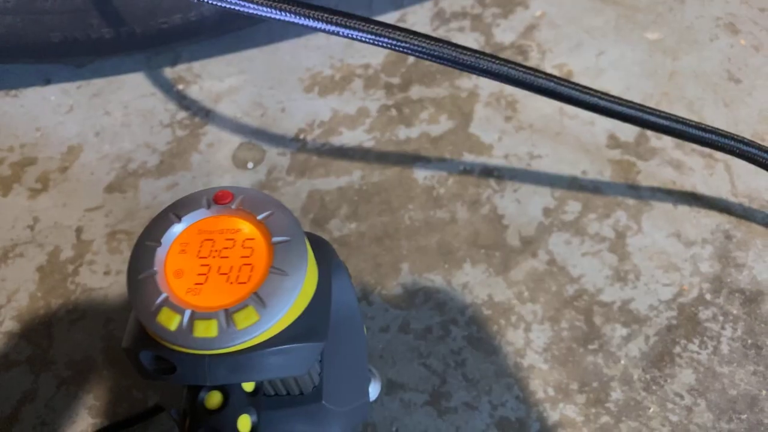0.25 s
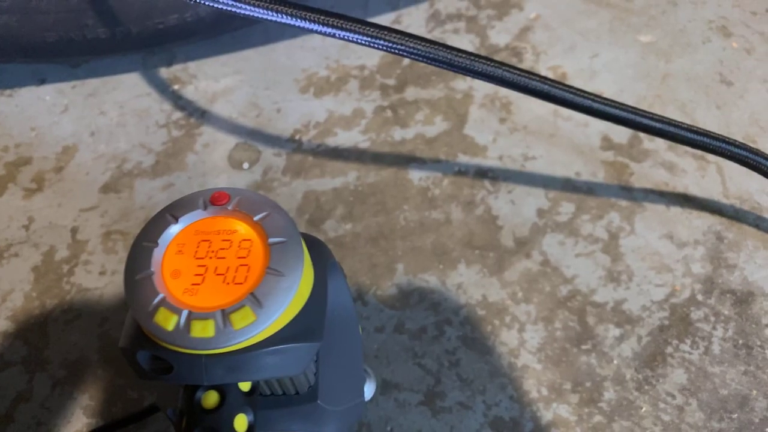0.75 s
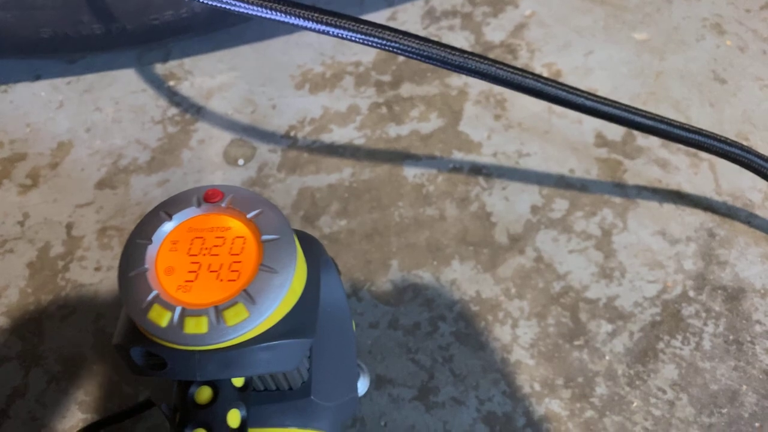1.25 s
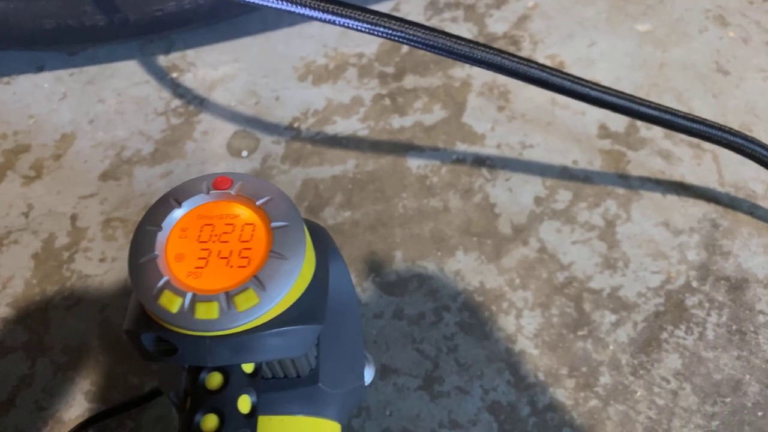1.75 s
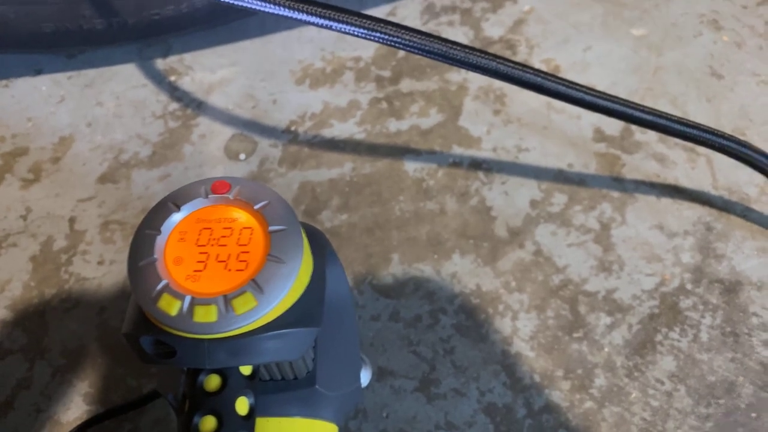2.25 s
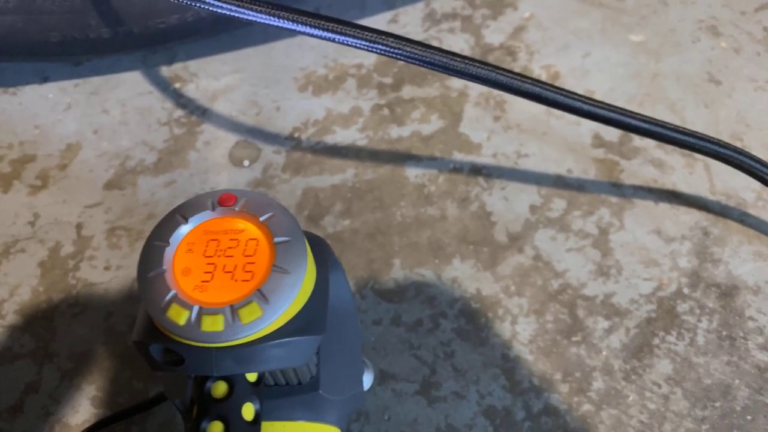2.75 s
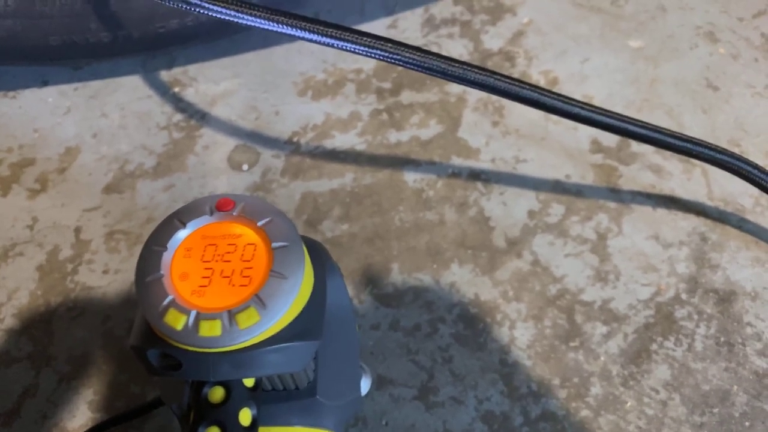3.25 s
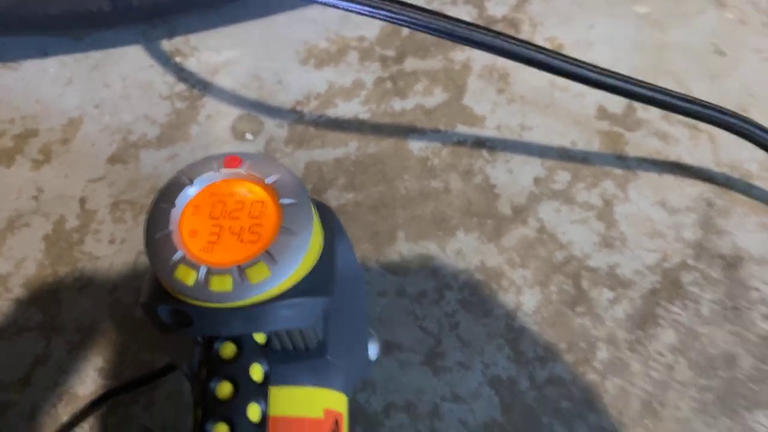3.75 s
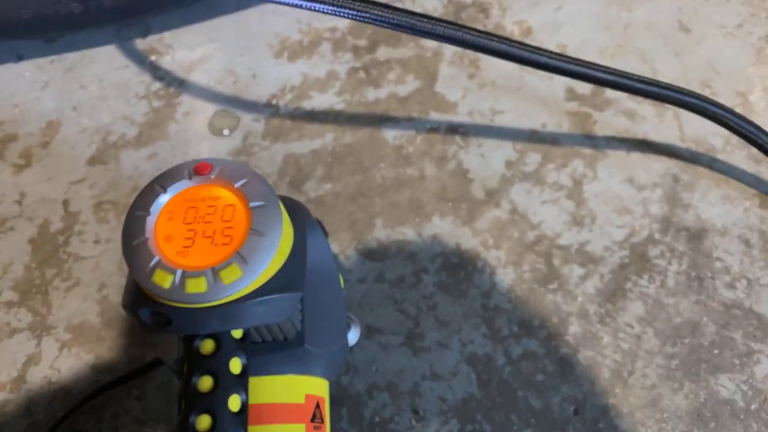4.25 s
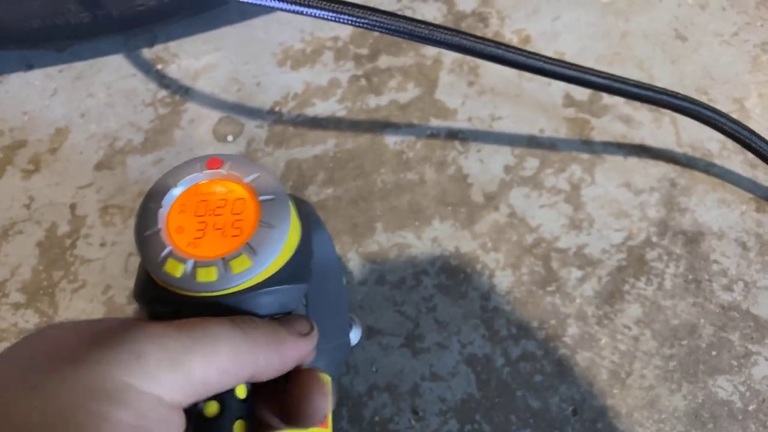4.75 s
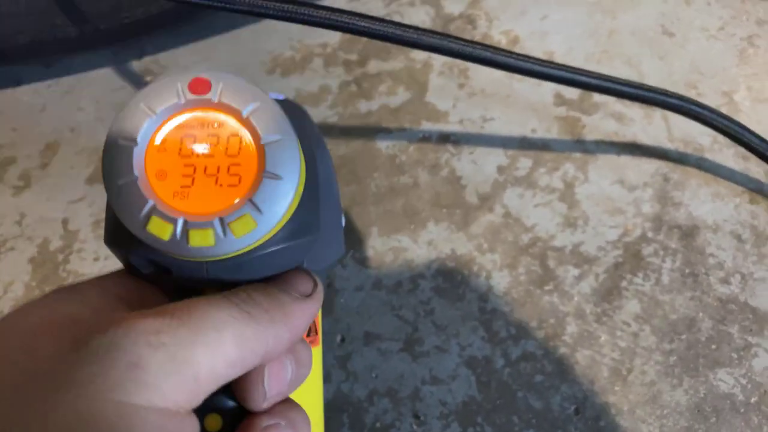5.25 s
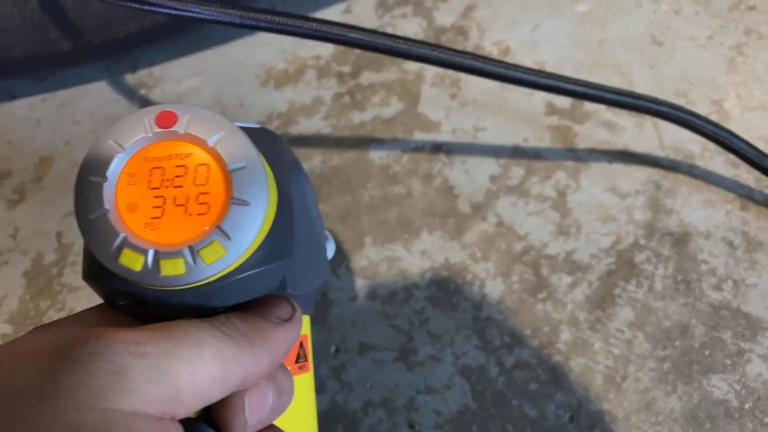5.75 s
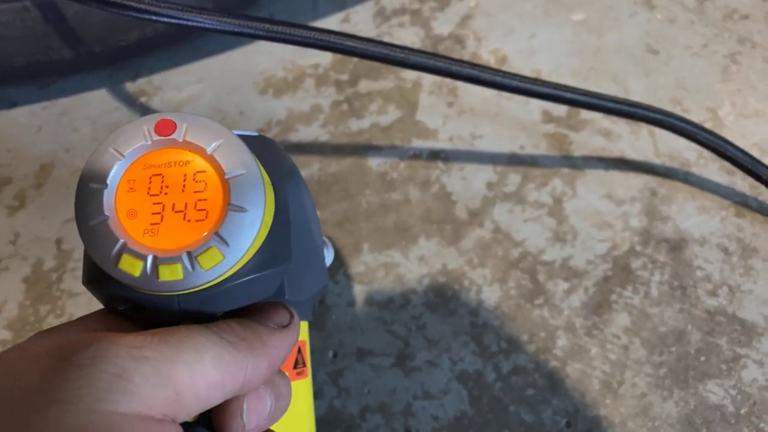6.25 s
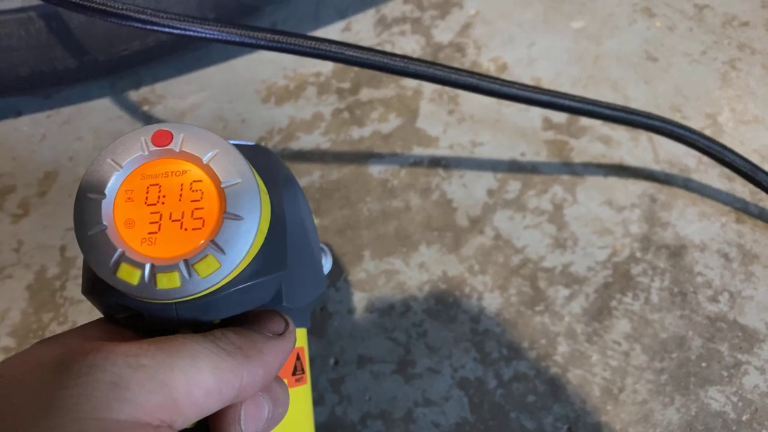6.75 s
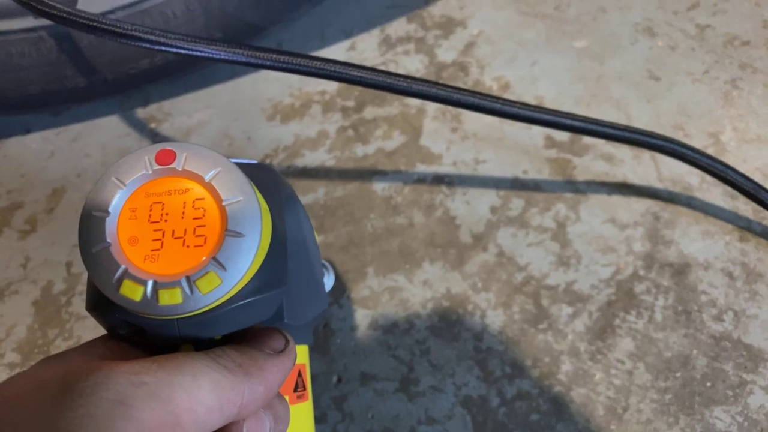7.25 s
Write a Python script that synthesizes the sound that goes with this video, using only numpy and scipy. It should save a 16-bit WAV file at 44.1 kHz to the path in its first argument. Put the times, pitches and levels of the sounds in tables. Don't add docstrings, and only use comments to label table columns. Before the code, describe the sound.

Loud, dense mechanical buzzing from a portable tire inflator, close and dry in open air. It holds nearly the same low pitch throughout, with tiny speed wobbles and a gritty metallic rattle on top. After about four seconds the treble dims as a hand comes near; just past five there is a brief rattly swell as it closes, then a more muffled buzz continues to the end. Very faint engine rumble lies below.

```python
import sys
import numpy as np
from scipy import signal
from scipy.fft import rfft, irfft, next_fast_len
from scipy.io import wavfile
from scipy.ndimage import uniform_filter1d

SR = 44100
rng = np.random.default_rng(int(sys.argv[2]) if len(sys.argv) > 2 else 0)


def master_out(mix):
    frames = np.transpose(np.atleast_2d(mix))
    ceiling = np.clip(frames, -1, 1)
    pcm = np.round(ceiling * 32767).astype(np.int16)
    wavfile.write(sys.argv[1], SR, pcm)


def invert_db(x):
    u = np.asarray(x, float) / 20
    return 10 ** u


N = 331191
LONG = next_fast_len(N)
HZ = np.fft.rfftfreq(LONG, 1 / SR)

# time_s, strokes_per_s
CRANK_SPEED = [(0.0, 52.769), (0.38, 52.903), (0.58, 52.781), (1.89, 53.332), (2.42, 52.995),
               (3.04, 53.475), (3.96, 52.965), (4.49, 52.996), (5.39, 52.865), (6.3, 53.125),
               (6.87, 53.125), (7.51, 52.796)]
FIRST_TURN = -.367
STROKE_SAMPLES = 1024
FREE_STROKES_PER_S, DB_PER_STROKE_PER_S = 53.02, 0.6
# time_s, hand_state (0 away, 1 shading, 2 gripping)
HAND = [
    (0, 0.19),
    (3.9, 0.33),
    (4.06, 0.67),
    (4.25, 1.32),
    (4.6, 1.18),
    (4.97, 1.35),
    (5.12, 2.21),
    (7.6, 2.18),
]
# hand_state, thump_db, rattle_db, tick_db, hiss_db
HAND_GAIN = [(.3, -18, -33.5, -48, -43), (0.721, -20, -38.5, -49.5, -46.5), (1.2, -20.5, -42.5, -50, -53.5),
             (1.35, -20.5, -43.5, -51, -49.5), (2.15, -19.5, -46.5, -46.5, -49)]
# thump_db, rattle_db, tick_db, hiss_db
SQUEEZE_LIFT = (0.4, 1.1, 0, -2)
SQUEEZE_S, SQUEEZE_WIDTH_S = 5.21, 0.082
SQUEEZE_HZ, SQUEEZE_RING_HZ, SQUEEZE_RING_DB = 3330, 260, -45.5
# thump_db, rattle_db, tick_db, hiss_db
SWAY = (.15, .4, 0.602, 1.2)
# crank_multiple, away_db, shading_db, gripping_db
LOW_ORDERS = [(1, -13, -11.5, -13), (2, -13.5, -12, -14.5), (3, -18, -17, -19), (4, -15.5, -13, -15.5),
              (5, -10.5, -9.5, -11.5), (6, -9, -6, -8), (7, -9, -6.5, -8), (8, -6.5, -5, -6.5),
              (9, -12, -12.5, -16), (10, -18.5, -14.5, -18), (11, -10, -8, -12), (12, -4, -6.5, -10.5),
              (13, 1.5, 1.5, -2.5), (14, 2, 1.5, -2.5), (15, 2, -1, -1), (16, 3.5, 3, 2.5),
              (17, -6.5, -4.5, -3), (18, -17, -10.5, -10)]
TOP_ORDER = 37
# centre_multiple, half_width_multiples, level_db
PANEL_HUMPS = [
    [(20, .6, -22.5), (22.78, .9, -16.5), (24.43, .9, -12), (26.62, 1.4, -11.5), (31.2, 1.5, -25),
     (32.8, .8, -18), (36.7, 1.1, -26.5)],
    [(18.8, 1.1, -17.5), (24.74, 1.3, -19), (27, .6, -14.5), (30.74, 2.5, -19), (37, .8, -34)],
    [(18.98, .9, -17.5), (21, .6, -22), (24.05, .95, -18), (28.05, 1.1, -19), (30.78, 1.6, -15),
     (37, .8, -24.5)],
]
MODE_GLIDES = [
    [(6.13, 0.19, .02), (15.63, 0.14, .17), (25.1, 5.5, .1), (31.2, 3.1, .3)],
    [(6, 0.2, .02), (15.7, 0.5, .18), (24.75, -1, .2), (31.26, 2.5, .22)],
    [(6, -0.4, .02), (15.75, 1.1, .17), (26.8, -0.5, .1), (32.7, 4, .2)],
]
# freq_hz, density_db_per_hz
CASE_COLOUR = [
    [(1180, -41), (2000, -10.5), (2220, 4.5), (2560, -2.5), (3250, 5), (4160, -16), (4410, -20.5),
     (5510, -15.5), (6590, -17), (7810, -14), (9910, -23.5), (12300, -28), (13900, -9), (15300, -16)],
    [(1180, -55), (2000, 3.5), (2640, 0.5), (2880, 0), (3360, -1), (3800, -10.5), (6070, -17.5),
     (6970, -17), (7600, -9), (10400, -34), (15900, -19)],
    [(1180, -24), (2000, 6.5), (2070, -7), (2480, -3.5), (3390, -4), (3770, -6), (4110, -13), (4560, -13.5),
     (4760, -12), (5610, -0.5), (6850, -12.5), (11500, -23), (13600, -8), (15900, -16)],
]
# freq_hz, width_hz, level_db
FREE_MODES = [(2316, 82, 0.5), (2790, 110, -3.5), (3233, 61, 4), (3550, 60, -2), (4090, 106, -5),
              (4834, 51, -15), (5420, 200, -14.5), (7470, 58, -16.5), (7950, 86, -13.5), (8280, 92, -20),
              (10800, 120, -24), (11440, 140, -21), (13440, 330, -11.5), (14100, 1500, -17)]
# freq_hz, width_hz, level_db
SHADED_MODES = [(2296, 70, -1), (2374, 38, 6.5), (2580, 25, 0.5), (3275, 41, 7), (3530, 22, 2.5),
                (3980, 72, -4.5), (4990, 80, -8), (5530, 40, -15), (5850, 65, -5.5), (7600, 290, -21),
                (10940, 280, -25.5), (11800, 130, -23), (12400, 90, -20), (13300, 170, -13)]
# freq_hz, width_hz, level_db
GRIPPED_MODES = [(2310, 28, 1.5), (2800, 180, -4.5), (3300, 48, 1.5), (4110, 70, -2), (4905, 72, -5),
                 (5530, 180, -6), (6390, 120, -15), (7280, 140, -11.5), (8200, 500, -15), (10400, 190, -14),
                 (10980, 190, -14.5), (12550, 450, -9), (13600, 550, -9), (14000, 74, -12)]
# freq_hz, width_hz, depth_db
ECHO_DIPS = [(6080, 110, 3), (6800, 150, 4), (8700, 240, 12), (9600, 130, 3), (10240, 170, 11),
             (12880, 180, 6), (13700, 120, 0)]
BAND_EDGES_HZ = 1990, 2900, 4300, 9500, 17000
KNOCKS = [(-.29, .7), (-.11, 1.3), (.04, 1.2), (.13, 1.1), (.27, .9)]
KNOCK_FALL_TURNS = .045
# freq_hz, level_db
FRESH_RATTLE = [(1900, -13.5), (3800, -12), (6000, -7), (10000, -3.5), (14000, .5)]
# freq_hz, density_db_per_hz
WASH_SPECTRA = [
    [(30, -80), (62, -80), (85, -77), (130, -80), (240, -79), (520, -77.5), (720, -70), (860, -71),
     (1050, -78.5), (1400, -79), (1900, -83.5), (3200, -91), (4400, -99), (14000, -99)],
    [(30, -84), (62, -73), (85, -81), (130, -80.5), (240, -79), (520, -79.5), (720, -74.5), (860, -70),
     (1050, -77.5), (1400, -84.5), (1900, -88.5), (3200, -91.5), (4400, -99), (14000, -101)],
]
# freq_hz, level_db, wander_db
ENGINE_ORDERS = [(35.2, -70, -6), (59.5, -66, 5), (71.7, -46.5, 3.5), (69.5, -63, 20), (86, -54, 2),
                 (96, -71, 2), (120, -68.5, 10)]
# freq_hz, floor_db
BAND_FLOOR = [(3000, -75), (4400, -61), (7000, -64), (9000, -63.5), (14500, -64.5), (15800, -63)]
# loudness_db, edge_hz
TOP_EDGE = [(-21.2, 15950), (-20, 15100)]


def crank():
    steady = FIRST_TURN + np.cumsum(curve(CRANK_SPEED)) / SR
    return steady + 0.001 * drift(8) + 0.00076 * drift(30)


def thump(turns, slower=0.53, ring=0.39):
    layers = []
    for state, glides in enumerate(MODE_GLIDES):
        k, db = orders(state)
        modes = np.array(glides)
        nearest = abs(k[:, None] - modes[:, 0]).argmin(1)
        centre, lead, glide = modes[nearest].T
        phase = np.pi + lead - glide * np.where(k < centre, slower, 1) * (k - centre) ** 2
        phase += 4.7 * np.clip((3 - k) / 2, 0, 1)
        db = np.maximum(db, -32)
        log_gain = np.log(invert_db(db))
        phase += ring * causal(log_gain - uniform_filter1d(log_gain, size=3))
        layers.append(play(np.append(0, invert_db(db) * np.exp(1j * phase)), turns))
    return level(axis=1) * invert_db(0.042 * drift(25)) * blend(layers)


def orders(state):
    k = np.arange(1, TOP_ORDER + 1)
    centre, width, top_db = np.array(PANEL_HUMPS[state]).T
    high = k[len(LOW_ORDERS):, None]
    humps = (top_db - 6 * ((high - centre) / width) ** 2).max(1)
    return k, np.append(np.array(LOW_ORDERS)[:, state + 1], humps)


def rattle(turns):
    cases = [case(state) for state in range(3)]
    low = chatter(turns, order=0, peak=-.1, rise=.19, fall=.27, edge=1.9, rest=.22, rebound=0.12, knock=3.5)
    high = chatter(turns, order=1, peak=-0.018, rise=0.19, fall=.24, edge=1.63, rest=0.19,
                   rebound=0.21, knock=1.9)
    ticks = chatter(turns, order=2, peak=0.053, rise=.2, fall=0.16, edge=1.32, rest=0.15,
                    rebound=0.059, knock=0.68)
    hiss = chatter(turns, order=3, peak=.04, rise=.15, fall=.11, edge=1.3, rest=0.16, rebound=.05, knock=0.32)
    panel = evened(irfft(high / (1 + 2j * (HZ - SQUEEZE_HZ) / SQUEEZE_RING_HZ) ** 2, LONG)[:N])
    total = invert_db(SQUEEZE_RING_DB) * squeeze() * panel
    for axis, drive in enumerate((low + high, ticks, hiss), 2):
        through_case = [evened(irfft(drive * response, LONG)[:N]) for response in cases]
        total = total + level(axis) * blend(through_case)
    return total


def chatter(turns, order, **timing):
    lo, hi = BAND_EDGES_HZ[order:order + 2]
    shape = burst(np.arange(STROKE_SAMPLES) / STROKE_SAMPLES, **timing)
    change_rad = 0.23 * drift(2.5)
    order_hz = np.arange(STROKE_SAMPLES // 2 + 1) * FREE_STROKES_PER_S
    band = (order_hz > lo) & (order_hz <= hi)
    same = np.cos(change_rad) * play(pattern(shape, band), turns)
    same += np.sin(change_rad) * play(pattern(shape, band), turns)
    new = rng.standard_normal(N) * burst(turns, **timing) * invert_db(0.79 * drift(60))
    share = invert_db(read(FRESH_RATTLE, HZ))
    drive = (rfft(evened(same), LONG) + share * rfft(evened(new), LONG)) / np.sqrt(1 + share ** 2)
    return drive * ((HZ > lo) & (HZ <= hi))


def burst(turns, peak, rise, fall, edge, rest, rebound, knock):
    u = (turns - peak + .5) % 1 - .5
    swell = np.exp(-(abs(u) / np.where(u < 0, rise, fall)) ** edge)
    swell = swell + rebound * np.exp(-((u - .3) / 0.066) ** 2)
    knocks = sum(a * np.exp(-((turns - at) % 1) / KNOCK_FALL_TURNS) for at, a in KNOCKS)
    return rest + swell * (1 + knock * knocks)


def pattern(shape, band):
    z = rfft(rng.standard_normal(STROKE_SAMPLES) * shape)
    for _ in range(30):
        x = irfft(band * z / abs(z))
        local_rms = np.sqrt(uniform_filter1d(x ** 2, size=24, mode="wrap") + 1e-12)
        z = np.where(band, rfft(x * shape / local_rms), z)
    return z / abs(z)


def case(state, broad_db=-6, damping=0.021):
    grid = np.fft.rfftfreq(8192, 1 / SR)
    power = invert_db(read(CASE_COLOUR[state], grid) + broad_db) ** 2
    for f, w, db in (FREE_MODES, SHADED_MODES, GRIPPED_MODES)[state]:
        width_hz = np.maximum(w, damping * f + 25)
        power += invert_db(db) ** 2 / (1 + (2 * (grid - f) / width_hz) ** 2) ** 2
    power *= invert_db(-2 * sum(db / (1 + (2 * (grid - f) / w) ** 2) for f, w, db in ECHO_DIPS))
    log_gain = np.log(power) / 2
    return np.exp(np.interp(HZ, grid, log_gain) + 1j * np.interp(HZ, grid, causal(log_gain)))


def squeeze():
    return np.exp(-((np.arange(N) / SR - SQUEEZE_S) / SQUEEZE_WIDTH_S) ** 2)


def level(axis):
    table = np.array(HAND_GAIN)
    db = np.interp(curve(HAND), table[:, 0], table[:, axis])
    db = db + DB_PER_STROKE_PER_S * (curve(CRANK_SPEED) - FREE_STROKES_PER_S)
    return invert_db(db + SQUEEZE_LIFT[axis - 1] * squeeze() + SWAY[axis - 1] * drift(2.5))


def blend(layers):
    state = curve(HAND) * (len(layers) - 1) / 2
    return sum(x * np.sin(np.pi / 2 * np.clip(1 - abs(state - k), 0, 1)) ** 2.054
               for k, x in enumerate(layers))


def wash(turns, throb=0.024):
    swell = 1 + throb * np.cos(2 * np.pi * turns)
    white = rfft(rng.standard_normal(N) * swell * invert_db(2.1 * drift(3.6)), LONG)
    return blend([irfft(white * invert_db(read(w, HZ) + 47.0), LONG)[:N] for w in WASH_SPECTRA])


def engine():
    t = np.arange(N) / SR
    total = np.zeros(N)
    for hz, db, wander_db in ENGINE_ORDERS:
        gain = np.sqrt(2) * invert_db(db + wander_db * np.tanh(drift(2.2)))
        total += gain * np.sin(2 * np.pi * hz * t + 1.2 * drift(1.3))
    return total


def play(spectrum, turns):
    fine = irfft(spectrum, 8 * STROKE_SAMPLES)
    return evened(np.interp(turns % 1, np.arange(len(fine)) / len(fine), fine, period=1))


def causal(log_gain):
    return -signal.hilbert(np.append(log_gain, log_gain[-2:0:-1])).imag[:len(log_gain)]


def evened(x):
    return x / np.sqrt(np.mean(x ** 2) + 1e-20)


def curve(rows, axis=1):
    rows = np.array(rows, float)
    return np.interp(np.arange(N) / SR, rows[:, 0], rows[:, axis])


def read(points, hz):
    f, value = np.transpose(points)
    return np.interp(np.log(hz + 1), np.log(f + 1), value)


def drift(top_hz):
    return evened(irfft(rfft(rng.standard_normal(LONG)) * (HZ < top_hz), LONG)[:N])


def scene():
    turns = crank()
    return (thump(turns) + rattle(turns) + wash(turns) + engine())[None]


def band_limit(x):
    return signal.sosfilt(signal.butter(12, 16030, fs=SR, output="sos"), x)


def record(dry):
    hz, _, z = signal.stft(dry[0], SR, nperseg=2048, noverlap=1536)
    power = abs(z[:1024]) ** 2
    total = power.sum(0)
    bands = uniform_filter1d(power.reshape(128, 8, -1).mean(1), size=3).repeat(8, axis=0)
    z[:1024] *= bands > invert_db(2 * read(BAND_FLOOR, hz[:1024]))[:, None] * total
    loud_db = 10 * np.log10(uniform_filter1d(total, size=15))
    ragged_hz = 220 * evened(uniform_filter1d(rng.standard_normal(len(loud_db)), size=3))
    z *= hz[:, None] < np.interp(loud_db, *np.transpose(TOP_EDGE)) + ragged_hz
    mix = signal.istft(z, SR, nperseg=2048, noverlap=1536)[1][None, :N]
    return band_limit(mix)


dry = scene()
out = record(dry)
master_out(out)
```